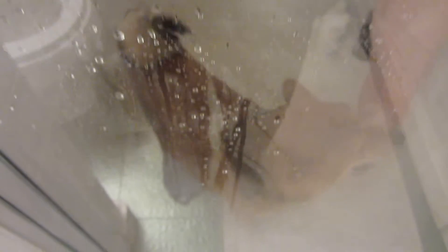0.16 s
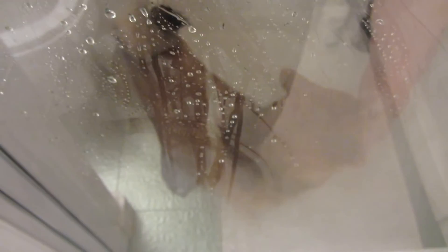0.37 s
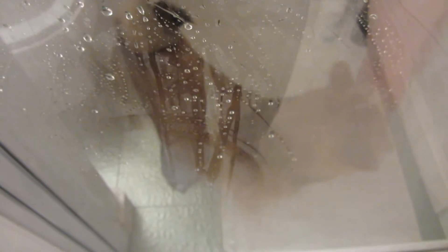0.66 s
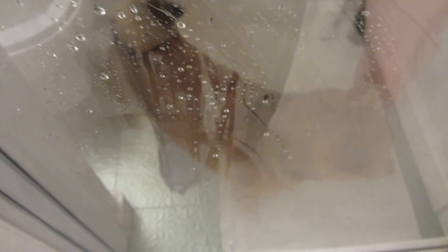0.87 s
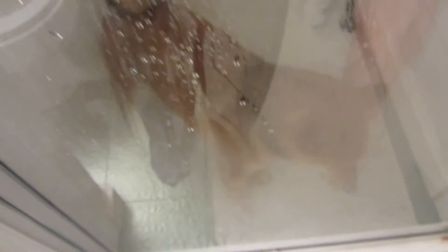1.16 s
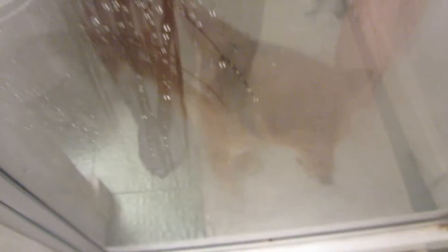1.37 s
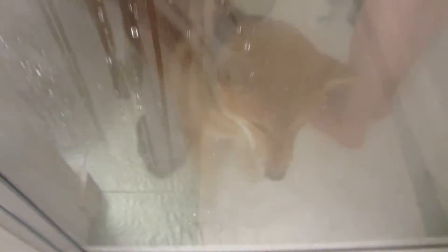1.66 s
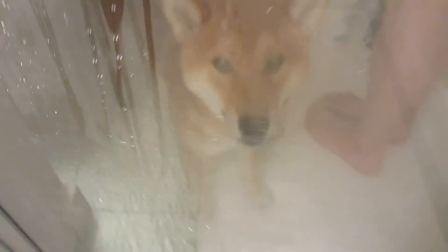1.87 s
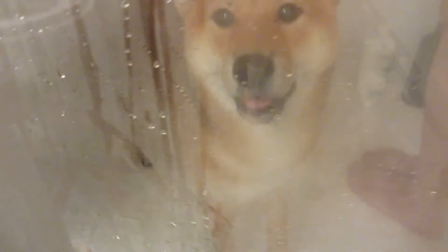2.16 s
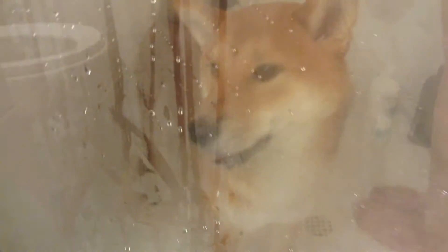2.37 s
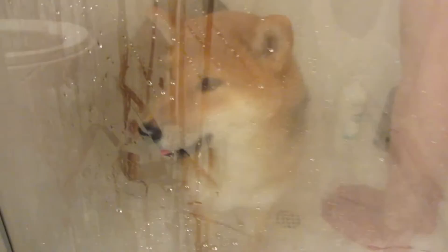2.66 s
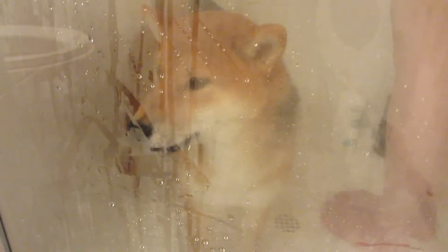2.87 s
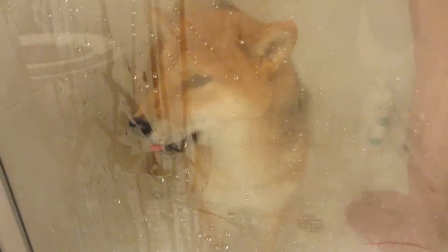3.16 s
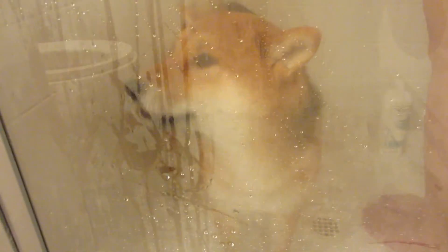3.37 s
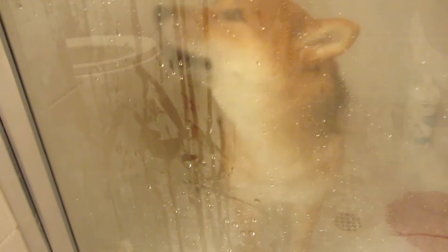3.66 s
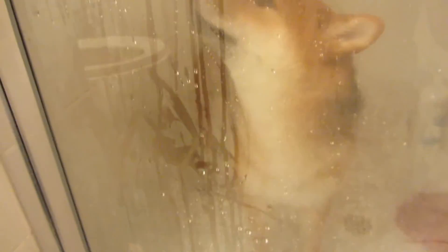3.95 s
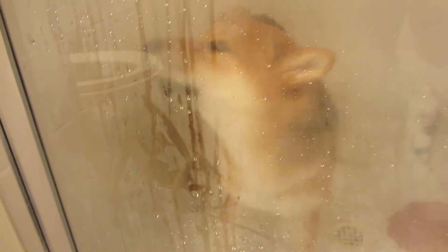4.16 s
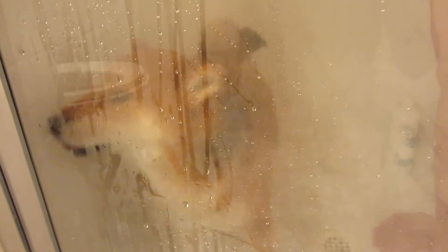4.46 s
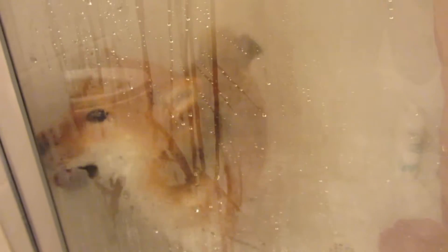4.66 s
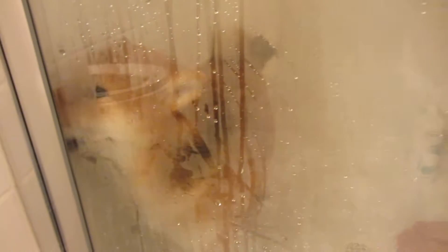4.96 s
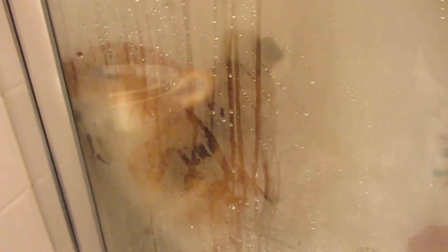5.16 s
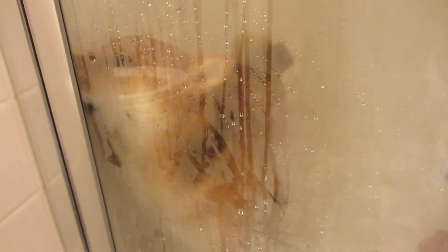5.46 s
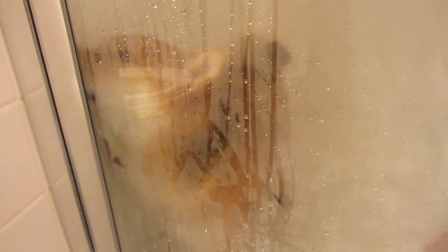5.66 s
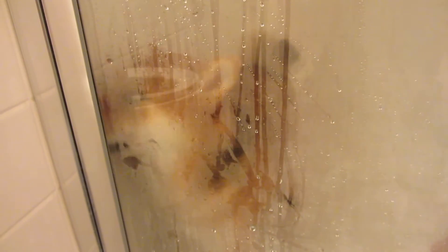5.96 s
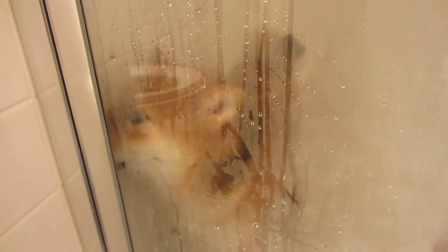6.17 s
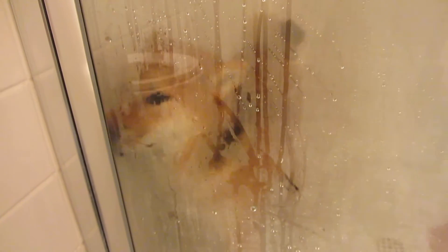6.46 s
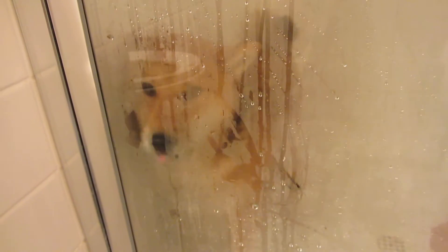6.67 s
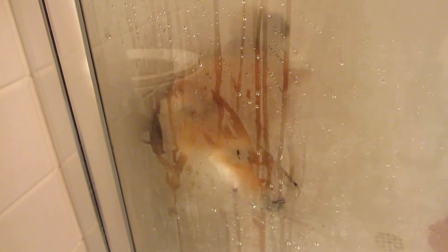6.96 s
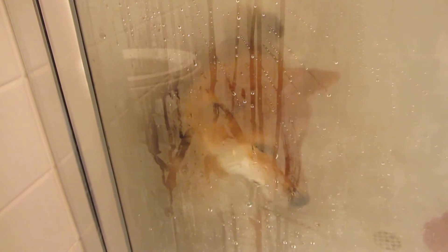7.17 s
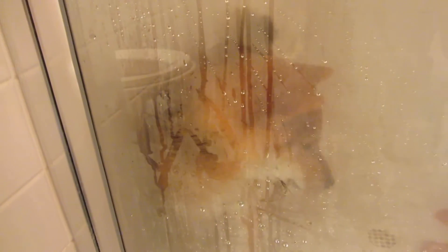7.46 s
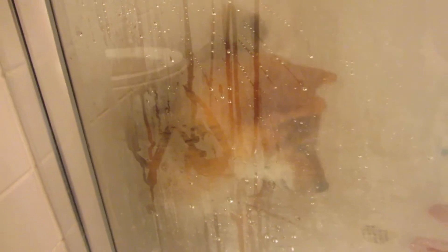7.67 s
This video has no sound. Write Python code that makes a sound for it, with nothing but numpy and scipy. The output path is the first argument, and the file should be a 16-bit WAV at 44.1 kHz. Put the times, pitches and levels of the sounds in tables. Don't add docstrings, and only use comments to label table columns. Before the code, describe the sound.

A small dog yelps in a tiled shower stall, heard close through glass and slightly right of centre. The tail of one cry opens, then four sharp yelps follow at about 0.2, 0.6, 1.0 and 1.3 seconds, each leaping quickly to around 1 kHz. A soft falling whimper and nasal air fill 1.5 to 2.0, with a weak low cry and a tiny tongue click near 2. A subdued yelp at 2.4 leads into a dense string from 2.8 to 5.3, loudest around 3.3, 4.3 and 4.7, some raspy and cracking, small whimpers between. Thin nose whistles mark a pause near 5.5. More cries come at 5.8, a harsh one at 6.1, another at 6.3, and a weak one at 6.8. Nasal huffs remain, strongest near 7.4, then fade. Short tile echo, slightly clipped peaks, faint steady water hiss and low fan hum throughout.

```python
import sys
import numpy as np
from scipy import signal
from scipy.fft import rfft, irfft, next_fast_len
from scipy.io import wavfile
from scipy.ndimage import map_coordinates

SR = 44100
rng = np.random.default_rng(int(sys.argv[2]) if len(sys.argv) > 2 else 0)


def store_pcm(level_fs):
    pcm = np.round(np.clip(level_fs, -1, 1) * 32767).astype(np.int16)
    wavfile.write(sys.argv[1], SR, np.atleast_2d(pcm).T)


def nominal_scale(level):
    x = np.asarray(level, float) / 20
    return 10 ** x


N = 344417

# (start [s], held [s], first pitch [Hz], top pitch [Hz], level [dB])
CRIES = [(-.12, .1, 639, 687.2, -29), (0.189, .12, 836, 1090, -14.5), (0.569, .08, 805.6, 971.5, -12),
         (.975, .07, 812, 985, -12.5), (1.323, .1, 779.6, 957, -13.5), (1.95, 0.039, 470.6, 392, -37),
         (2.388, .065, 439.7, 506, -22.5), (2.787, .09, 576.4, 779.4, -13), (2.977, .11, 742, 845.6, -14),
         (3.273, .15, 794.6, 1191, -11), (3.509, .11, 756, 822.4, -25), (3.818, .125, 807.3, 1062, -13),
         (4.035, .075, 766, 872.8, -15), (4.32, .135, 887.3, 1041, -10), (4.68, .12, 823.7, 1070, -11.5),
         (4.969, .1, 722, 810.5, -17), (5.237, .1, 582.6, 722.8, -16.5), (5.82, 0.07, 558.6, 622.8, -22.5),
         (6.072, .11, 662.3, 952, -11), (6.342, .1, 723, 819.8, -12.5), (6.844, .07, 522.6, 559.2, -28)]


def unit(x):
    return x / np.sqrt(np.mean(x ** 2) + 1e-20)


def along(points, hz):
    f, v = np.transpose(points)
    return np.interp(np.log(hz + 1), np.log(f + 1), v)


def wobble(size, rate):
    knots = rng.standard_normal(int(size * rate / SR) + 4)
    return map_coordinates(knots, [np.arange(size) * rate / SR])


def coloured(x, gain):
    m = next_fast_len(x.shape[-1] + 8192)
    return irfft(rfft(x, m) * gain(np.fft.rfftfreq(m, 1 / SR)), m)[..., :x.shape[-1]]


def paired(two, gain):
    # (frequency [Hz], likeness [0-1])
    alike = [(30, 0.17), (70, 0.29), (150, 0.076), (300, 0.93), (700, 0.73), (1200, 0.41), (2500, 0.36),
             (5000, 0.022)]
    turn = lambda hz: np.arccos(np.clip(along(alike, hz), -1, 1)) / 2
    mid, side = coloured(two, lambda hz: gain(hz) * [np.cos(turn(hz)), np.sin(turn(hz))])
    return np.array([mid + side, mid - side])


def sink_into_whimper(rows, start, gape, half, rasp):
    # (start [s], length [s], first pitch [Hz], last pitch [Hz], level [dB])
    whimpers = [(1.554, .23, 816.4, 627.7, -36), (2.046, .11, 390, 365.5, -52.5),
                (3.113, 0.042, 686, 602, -35.5), (3.644, 0.031, 745, 690, -32),
                (4.168, 0.037, 772, 698, -40), (4.492, 0.05, 931, 880, -28.5),
                (4.807, 0.031, 804, 707, -34), (5.091, 0.023, 704, 660, -28), (6.5, 0.14, 686, 612, -41),
                (6.98, 0.079, 594.4, 570.5, -40.5), (7.147, 0.092, 591.3, 576, -45.5)]
    rise_s = .015
    # (share of length, share of pitch fall, delay [s], level [dB])
    shape = [(0, 0, 0, 0), (0, 0, rise_s, 0), (.59, .92, 0, 0), (1, 1, 0, -16)]
    following = min([c[0] for c in CRIES if c[0] > start] + [N / SR])
    for at, length, from_hz, to_hz, soft_db in whimpers:
        if start < at < following:
            rows = [row for row in rows if row[0] < at - rise_s]
            for share, sunk, late, dip_db in shape:
                opening_db = gape - 8 - 8 * share
                hz = from_hz + sunk * (to_hz - from_hz)
                rows.append((at + share * length + late, hz, soft_db + dip_db, opening_db, half, rasp))
    return rows


def stages(start, held, first_hz, top_hz, db, risen, gape, drift_db, rasp):
    half = 2.4 * max(rasp - .22, 0)
    leap = max(risen - .055 * max(1 - 1.9 * rasp, .2), 0)
    linger_s = .09 * max(1 - 1.5 * rasp, .1)
    last_hz = top_hz * (1 - .011 - .2 * rasp)
    landed_hz = first_hz + .8 * (top_hz - first_hz)
    settled = risen + .035
    attack_s, release_s, calm = .025, .049, .05
    middle = min(risen - .01, (attack_s + held) / 2)
    # (time [s], level [dB], mouth opening [dB/octave], half-pitch share, rasp [0-1])
    steps = [
        (0, -27, 7.2, .15, calm),
        (.006, -14, 7.2, 0, calm),
        (attack_s, -10 * rasp, 1.7 + 15 * rasp, 0, calm + rasp / 4),
        (middle, 1, 7.16, half / 2, rasp / 2),
        ((2 * middle + held) / 3, 1 + drift_db / 2, 7.16 / 2 - 18 * rasp, half, rasp),
        (held, drift_db, -4, half, rasp),
        (held + release_s, -24.5, -2, half, rasp),
        (held + release_s + linger_s, -36.5, -2, half, rasp)]
    s, *cols = np.transpose(steps)
    times = np.unique(np.append(s, [leap, risen, settled]))
    gain_db, opening_db, *rest = [np.interp(times, s, c) for c in cols]
    pitch = np.interp(times, [leap, risen, settled, settled + held],
                      [first_hz, landed_hz, top_hz, last_hz])
    rows = list(zip(start + times, pitch, db + gain_db, gape + opening_db, *rest))
    return sink_into_whimper(rows, start, gape, half, rasp)


def yelp(rows, vowel):
    # (frequency [Hz], gain [dB])
    throat = [(300, -8.5), (550, -0.5), (950, 2.5), (1300, -7.5), (1850, -7), (2400, -4.5), (2900, -8),
              (3400, -13), (4000, -31), (4800, -36.5), (5800, -39.5), (8000, -42.5), (10500, -50.5),
              (15500, -79)]
    s, *cols = np.transpose(rows)
    t = np.arange(s[0] - .004, s[-1], 1 / SR)
    hz, db, opening_db, half, rasp = [np.interp(t, s, c) for c in cols]
    half, rasp = np.clip(half, 0, 1), np.clip(rasp, 0, 1)
    jitter = (0.0044 + 0.02 * rasp) * wobble(len(t), 41.0)
    turns = np.cumsum(hz * (1 + jitter)) / SR
    k = np.arange(1, 41)[:, None] / 2
    lifts = list(zip((860, 1470, 2540, 5000), (0, *vowel)))
    mouth_db = lambda f: along(throat, f) + along(lifts, f)
    share = np.where(k % 1, half ** 1.2 * np.minimum(k, 1) ** 6, 1) * (k * hz < SR / 2.8)
    effort_db = 0.72 * (db - db.max()) * np.clip(np.log2(k * hz / 3600), 0, 1)
    tilt_db = opening_db * np.minimum(np.log2(k), 1.6)
    levels = share * nominal_scale(mouth_db(k * hz) + effort_db + tilt_db)
    slip = 2.2 * rasp * wobble(len(t), 350) * np.minimum(np.abs(k - .85), 3.5)
    voice = np.sum(levels * np.sin(2 * np.pi * k * turns + .8 * k * k + slip), axis=0)
    voice = voice / np.sqrt(np.sum(levels ** 2, axis=0) / 2)
    voice = voice * (1 + 0.45 * rasp * wobble(len(t), 180))
    puffs = rng.standard_normal(len(t)) * (1 + np.cos(2 * np.pi * turns))
    breath = unit(coloured(puffs, lambda f: nominal_scale(mouth_db(f)) / (1 + (1300 / (f + 1)) ** 3)))
    burst = 1.1 * np.exp(-(t - t[0]) / 0.008)
    edges = np.clip(np.minimum(t - t[0], t[-1] - t) / .004, 0, 1)
    return edges * nominal_scale(db) * (voice + (0.053 * rasp + burst) * breath)


def stall(x):
    # (frequency [Hz], t60 [s])
    tiles = [(300, 0.39), (900, 0.37), (2000, 0.31), (4000, 0.31), (6000, 0.5), (10000, 0.29)]
    hz, t, z = signal.stft(rng.standard_normal((2, SR * 3 // 5)), SR, nperseg=256)
    tail = signal.istft(z * nominal_scale(-60 * t / along(tiles, hz)[:, None]), SR, nperseg=256)[1]
    build_up = 1 - np.exp(-np.arange(tail.shape[1]) / SR / .004)
    tail = paired(tail * build_up, lambda hz: 1)
    tail = tail / np.linalg.norm(tail[0])
    pane = np.exp(-np.arange(30) / 2.0)
    tail[:, :len(pane)] += nominal_scale(-7.5) * pane / pane.sum()
    return signal.fftconvolve(x[None], tail, axes=1)


def echoed(sounds):
    out = np.zeros((2, N + 2 * SR))
    for s, dry_sound in sounds:
        wet = stall(dry_sound)
        out[:, round((1 + s) * SR):][:, :wet.shape[1]] += wet
    return out[:, SR:SR + N]


def cries():
    # (leap done after start [s], mouth gape [dB/octave], level change while held [dB])
    manners = [(0.051, 4, -2.5), (.065, -0.5, -8), (.04, 0.5, -2), (.06, 0.5, 0.5), (.06, 0.5, -3.5),
               (0.025, 0.5, 0.5), (.09, 4.5, -8.5), (.075, 3, 0), (0.068, -1, -4), (.062, -1.5, -10.5),
               (0.098, 0.5, 0.5), (.062, -1, -3), (.058, 5, -3), (0.045, 3.5, -8.5), (.058, 0.5, -2.5),
               (.058, 3, 2.5), (.058, 1, 1.5), (.06, -2, 7.5), (0.043, -0.5, -3), (0.051, 3, -2.5),
               (0.0617, 0.5, -0.5)]
    rasps = [.4, .32, .05, .06, .07, .14, .1, .2, .08, .32, .06, .32, .03, .34, .34, .06, .14, .04, .5, .18,
             .05]
    # (lift near 1.5 kHz [dB], near 2.5 kHz [dB], above 5 kHz [dB])
    vowels = [(-8, -6.5, -13), (3, 5.5, 3.5), (-4.5, 4, 3.5), (-1.5, -1, -0.5), (-2.5, -1, -1),
              (2.5, -11.5, 6), (0, -4, -1), (3.5, -2.5, 3.5), (4, 0, 6), (3, 1.5, 2), (-3.5, 0.5, 1),
              (5.5, 0, 2), (12.5, -1, 1), (-0.5, -7, -6.5), (-4, -4.5, -6.5), (-3, -7, -11), (0, -5, -12.5),
              (2, 0, 0.5), (1, -1.5, -2), (3.5, -3.5, -5), (-11, -29.5, -12)]
    sounds = []
    for cry, manner, rasp, vowel in zip(CRIES, manners, rasps, vowels):
        sounds.append((cry[0] - .004, yelp(stages(*cry, *manner, rasp), vowel)))
    return echoed(sounds)


def water_hiss():
    # (frequency [Hz], density [dB/Hz])
    floor = [(25, -40), (118, -9.5), (170, -13), (300, -10.5), (700, -12.5), (1000, -10.5), (1600, -18),
             (2500, -21), (4000, -28.5), (8000, -27.5), (12000, -36), (15500, -38.5)]
    hiss = unit(paired(rng.standard_normal((2, N)), lambda hz: nominal_scale(along(floor, hz))))
    return nominal_scale(-59.5 + 0.4 * wobble(N, 1.8)) * hiss


def fan_hum():
    phase = np.array([[0], [1.7]])
    return nominal_scale(-72 + 2.5 * wobble(N, 4)) * np.sin(2 * np.pi * 119 * np.arange(N) / SR + phase)


def whistle(hz, db, length):
    t = np.arange(0, length, 1 / SR)
    turns = np.cumsum(hz * (1 + .012 * wobble(len(t), 90))) / SR
    return nominal_scale(db) * np.sin(np.pi * t / length) ** 2 * np.sin(2 * np.pi * turns)


def nose_whistles():
    # (middle [s], pitch [Hz], level [dB], length [s])
    whistles = [
        (0.416, 5900, -70, 0.077),
        (0.453, 4950, -55.5, 0.036),
        (1.631, 4720, -60.5, 0.28),
        (2.57, 5580, -60.5, 0.08),
        (5.451, 6180, -50.5, 0.051),
        (5.555, 4710, -59, 0.13),
        (7.79, 5900, -61, 0.02),
    ]
    return echoed([(s - length / 2, whistle(hz, db, length)) for s, hz, db, length in whistles])


def nose_huffs():
    # (start [s], held [s], level [dB])
    huffs = [
        (1.561, 0.098, -61),
        (2.0, 0.086, -59.5),
        (5.429, 0.14, -72.5),
        (6.56, .72, -57.5),
        (7.332, 0.12, -55),
        (7.65, .2, -69.5),
    ]
    # (frequency [Hz], density [dB/Hz])
    air = [(300, -24.5), (700, -27.5), (1700, -1.5), (3500, -4), (5500, -6.5), (9000, -12.5), (11500, -21),
           (15500, -32.5)]
    rise_s, fade_db_per_s = 0.026, 115
    t, gain = np.arange(N) / SR, np.zeros(N)
    for s, held, db in huffs:
        fade_db = fade_db_per_s * np.maximum(t - s - held, 0)
        gain += nominal_scale(db - fade_db) * np.clip((t - s) / rise_s + 1, 0, 1)
    huff = unit(paired(rng.standard_normal((2, N)), lambda hz: nominal_scale(along(air, hz))))
    return gain * nominal_scale(2.5 + 1.3 * wobble(N, 27)) * huff


def lick():
    out = np.zeros((2, N))
    burst = rng.standard_normal((2, 200)) * np.hanning(200)
    click = coloured(burst, lambda hz: (hz > 4200) * (hz < 11500))
    out[:, round(1.993 * SR):][:, :click.shape[1]] += nominal_scale(-48) * click
    return out


def scene():
    dog = cries() + nose_whistles() + lick()
    return dog * nominal_scale([[-.4], [.4]]) + water_hiss() + fan_hum() + nose_huffs()


def band_limit(x):
    return signal.sosfilt(signal.butter(12, 15719, fs=SR, output="sos"), x)


def record(dry):
    top, hard = .65, 9
    clipped = dry / (1 + np.abs(dry / top) ** hard) ** (1 / hard)
    passed = coloured(clipped, lambda hz: hz / np.hypot(hz, 25))
    return band_limit(passed)


dry = scene()
out = record(dry)
store_pcm(out)
```